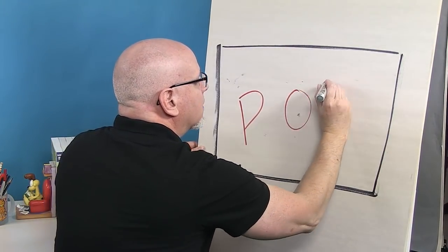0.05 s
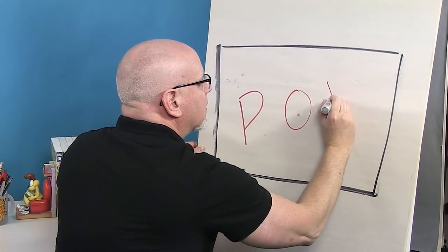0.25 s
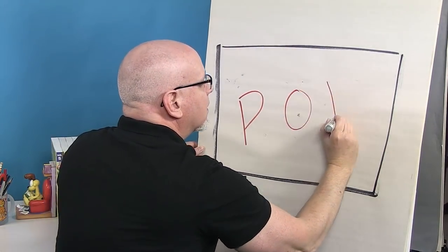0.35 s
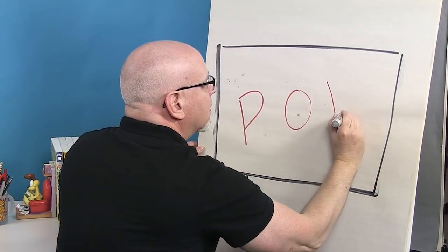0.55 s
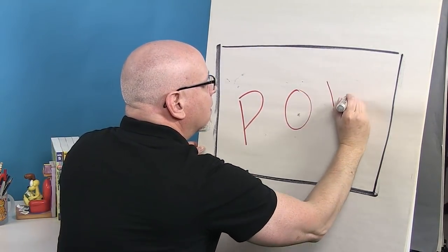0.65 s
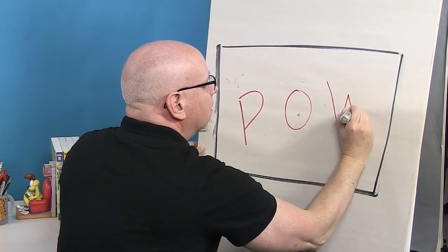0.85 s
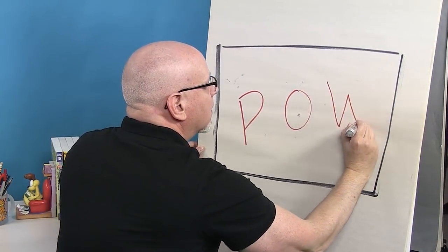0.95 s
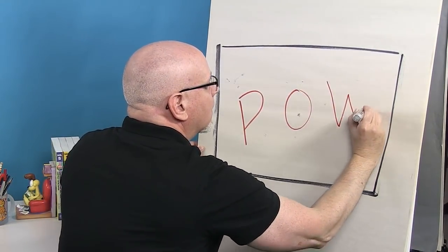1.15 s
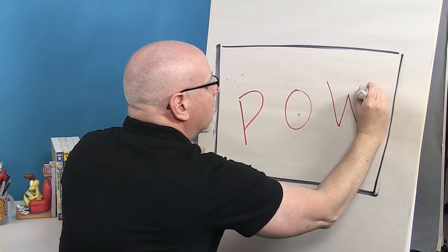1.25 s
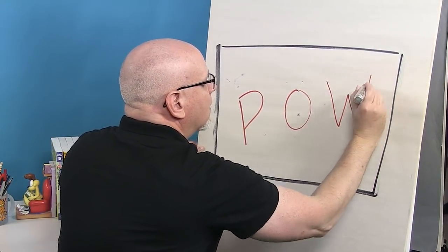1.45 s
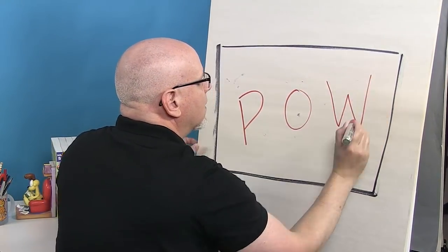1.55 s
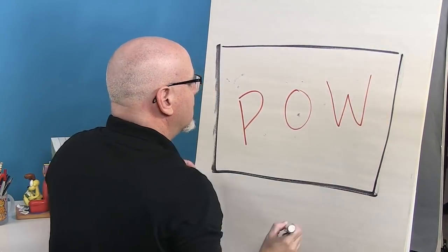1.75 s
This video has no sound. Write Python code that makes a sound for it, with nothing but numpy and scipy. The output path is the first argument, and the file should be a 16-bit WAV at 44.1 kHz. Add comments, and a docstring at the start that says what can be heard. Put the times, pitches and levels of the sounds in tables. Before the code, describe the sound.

Close, dry felt-tip marker strokes scratch across paper, four in a row, alternating softer and harsher. As the last one finishes, the pad gives two soft knocks on its easel, over the faint hum of a small room.

```python
"""A small room with a low hum, where a felt-tip marker draws the four strokes of a W on a large paper pad.
The tip catches on paper fibres and hisses through the pen's resonances, louder and raspier when pushed
up than when pulled down. Pen and hand brush the pad lightly, and as the hand eases off the pad knocks
twice against its easel."""
import sys
import numpy as np
from scipy import signal
from scipy.fft import rfft, irfft
from scipy.io import wavfile

SR = 44100
rng = np.random.default_rng(int(sys.argv[2]) if len(sys.argv) > 2 else 0)


def inscribe(sig):
    """Save sig as 16-bit PCM at rate SR to the path in sys.argv[1].

    A 1-D sig is mono; a 2-D sig holds one channel per row.
    Samples are clipped to [-1, 1] before scaling.
    """
    pcm = np.round(np.clip(np.atleast_2d(sig).T, -1, 1) * 32767)
    wavfile.write(sys.argv[1], SR, pcm.astype(np.int16))


N = 79380


def amp(db):
    """Decibels to gain."""
    return 10 ** (np.asarray(db) / 20)


def unit(x):
    """Scales to rms 1."""
    return x / np.sqrt(np.mean(x ** 2) + 1e-20)


def axes():
    """Time of each sample and frequency of each bin."""
    return np.arange(N) / SR, np.fft.rfftfreq(N, 1 / SR)


def read(points, hz):
    """Reads a curve on a log-frequency axis."""
    f, value = np.transpose(points)
    return np.interp(np.log(hz + 1), np.log(f + 1), value)


def colour(x, gain):
    """Minimum-phase EQ with the given gain at each frequency."""
    log_gain = np.log(np.maximum(gain, 1e-5))
    mirrored = np.concatenate([log_gain, log_gain[-2:0:-1]])
    response = np.exp(np.conj(signal.hilbert(mirrored)))[:len(gain)]
    return irfft(rfft(x) * response, N)


def room_tone():
    """A steady bed of ventilation rumble, faint hiss and mains hum."""
    # Each row: frequency in Hz, relative level of the air noise in dB.
    air_eq = [(15, -83), (25, -73), (64, -12), (119, -6), (178, -4), (198, -10.5), (260, -13.5), (349, -18),
              (421, -24), (523, -18), (648, -29), (826, -26.5), (1110, -29), (1710, -32), (15500, -39.5)]
    air_db, hum_db, hum_hz = -59, -65.5, 118.4
    t, hz = axes()
    air = unit(colour(rng.standard_normal(N), amp(read(air_eq, hz))))
    hum = np.sqrt(2) * np.sin(2 * np.pi * (hum_hz * t + rng.random()))
    return amp(air_db) * air + amp(hum_db) * hum


def friction():
    """Fine rubbing noise plus tiny snaps of the felt on paper fibres, juddering slightly."""
    snags_per_s, snag_spread_db, snag_share = 3500, 2.5, 0.38
    judder_hz, judder_db = 158, 0.54
    _, hz = axes()
    size = amp(snag_spread_db * np.minimum(rng.exponential(1, N), 5))
    snags = size * rng.choice([-1, 1], N) * (rng.random(N) < snags_per_s / SR)
    judder = unit(irfft(rfft(rng.standard_normal(N)) / (1 + (hz / judder_hz) ** 2), N))
    rub = np.sqrt(1 - snag_share) * rng.standard_normal(N)
    return (np.sqrt(snag_share) * unit(snags) + rub) * amp(judder_db * judder)


def near_echoes(x):
    """The writer's arm and body throw back six quick, quiet reflections."""
    _, hz = axes()
    delays_s = rng.uniform(0.00099, 0.008, size=6)
    echoes = amp(-20) * sum(np.exp(-2j * np.pi * hz * delay) for delay in delays_s)
    return irfft(rfft(x) * (1 + echoes), N)


def tip_resonance(x, centre_hz, width_hz=720):
    """The tip rings in a narrow band whose centre slides as the pen tilts."""
    turn = np.exp(2j * np.pi * np.cumsum(centre_hz) / SR)
    pole = np.exp(-np.pi * width_hz / SR)
    return 2 * (turn * signal.lfilter([1 - pole], [1, -pole], x / turn)).real


def stroke(moves, eq, gain_db):
    """Friction rings paper and pen; the felt's fizz on top opens with speed."""
    paper_below_hz, fizz_above_hz = 3455, 7490
    t, hz = axes()
    times, *lanes = np.transpose(moves)
    pen_db, fizz_db, paper_db, tip_hz = (np.interp(t, times, lane) for lane in lanes)
    hiss = rfft(near_echoes(colour(friction(), amp(read(eq, hz)))))
    low = 1 / (1 + (hz / paper_below_hz) ** 16)
    high = 1 - 1 / (1 + (hz / fizz_above_hz) ** 24)
    paper, pen, fizz = (unit(irfft(hiss * band, N)) for band in (low, 1 - low - high, high))
    tip = unit(tip_resonance(tip_resonance(friction(), tip_hz), tip_hz))
    body = amp(-1.75) * pen + amp(-6) * tip
    mix = amp(pen_db) * body + amp(paper_db - 1) * paper + amp(fizz_db + 0.5) * fizz
    on_paper = (t > times[0]) * (t < times[-1])
    return on_paper * amp(gain_db) * mix


def marker():
    """The W: pulled down, pushed up, and both again, each stroke coloured by the angle of the tip."""
    # Automation for each stroke. Each row: time in seconds, faders in dB for pen hiss, felt fizz and
    # paper rasp, tip resonance in Hz.
    down_1 = [(0.197,-70,-85,-70,4100),(0.217,-45.5,-67,-54,3930),(0.266,-42,-58.5,-53.5,4180),(0.315,-45,-58.5,-54,4040),(0.35,-43,-55.5,-51.5,4120),(0.363,-40.5,-54.5,-50,4300),(0.41,-42,-56,-52,4220),(0.484,-41.5,-58.5,-52,4270),(0.51,-55.5,-72,-55.5,4400),(0.525,-76,-87,-73,4330)]
    up_1 = [(0.549,-64,-80,-55,4010),(0.5545,-36,-54,-42.5,4000),(0.565,-38.5,-53,-46.5,3930),(0.6,-38.5,-53.5,-47.5,4100),(0.651,-42,-55.5,-49,4280),(0.675,-39.5,-53,-47,4250),(0.739,-41.5,-57.5,-48,3860),(0.769,-48,-72,-49.5,3750),(0.782,-70,-88,-62,3550),(0.795,-74,-88,-72,3500)]
    down_2 = [(0.822,-68,-84,-65,4200),(0.828,-44,-65,-49,4030),(0.84,-41.5,-63,-48,4210),(0.899,-42.5,-55,-51,4120),(0.951,-38.5,-54.5,-49.5,4280),(0.993,-40,-55,-49.5,4300),(1.059,-44.5,-62,-52.5,4320),(1.093,-57,-70,-52.5,4360),(1.11,-80,-89,-67,4200)]
    up_2 = [(1.128,-67,-82,-62,4040),(1.133,-36.5,-51,-40,4070),(1.168,-38,-55,-45,4400),(1.214,-37,-51.5,-44.5,4360),(1.228,-41.5,-50,-48,4350),(1.242,-36.5,-49.5,-44.5,4370),(1.275,-36.5,-49.5,-43.5,4400),(1.326,-41,-52,-47.5,3960),(1.34,-38.5,-53,-45.5,3950),(1.362,-40.5,-54.5,-51.5,4100),(1.379,-37.5,-58.5,-49,4100),(1.398,-42,-62,-49.5,4080),(1.418,-51,-76,-59,4180),(1.432,-68,-86,-65,4200)]
    # The colour of each stroke's hiss. Each row: frequency in Hz, relative level in dB.
    down_1_eq = [(130,-30),(520,-17),(800,-26),(1300,-12.5),(1950,-16.5),(2650,-13.5),(3050,-9),(3450,-9.5),(4230,-1),(4850,-6),(5600,-9),(6200,-11.5),(6750,-6.5),(7350,-13),(8250,-21.5),(9350,-16),(10400,-25.5),(11400,-23),(15800,-35)]
    up_1_eq = [(130,-27),(560,-17),(800,-26),(1800,-15),(2250,-10),(2650,-13),(3200,-4),(3750,-2),(4200,-1),(4750,-2),(5600,-13.5),(5950,-13),(6250,-15),(7150,-6),(8600,-22.5),(9450,-16.5),(10450,-27),(11400,-24.5),(15800,-40)]
    down_2_eq = [(130,-26),(520,-20),(800,-25.5),(1400,-15),(1900,-17.5),(2250,-12),(2700,-12.5),(3150,-7),(3550,-12),(4270,-1.5),(4850,-7.5),(5600,-11.5),(6200,-16),(6650,-10),(7200,-12.5),(8400,-26),(9200,-15.5),(10400,-29),(11400,-28),(15800,-43)]
    up_2_eq = [(130,-26),(560,-17),(800,-25.5),(1750,-19),(2250,-9),(2450,-10.5),(2950,-5),(3400,-6),(4000,0),(4650,0),(5500,-10),(6200,-13),(7200,-4.5),(8600,-20.5),(9150,-12.5),(9900,-18),(10450,-26),(11200,-25),(14000,-36),(15500,-34)]
    down_db, up_db = -0.5, 1
    return (stroke(down_1, down_1_eq, down_db) + stroke(up_1, up_1_eq, up_db)
            + stroke(down_2, down_2_eq, down_db) + stroke(up_2, up_2_eq, up_db))


def reverb(x):
    """The small room's diffuse tail, each band dying at its own speed."""
    # Each row: frequency in Hz, seconds to fall by 60 dB.
    decay_times = [(150,1),(500,0.21),(1500,0.35),(4000,0.58),(9000,0.71),(16000,0.45)]
    predelay_s = 0.0073
    hz, t, noise = signal.stft(rng.standard_normal(SR // 2), SR, nperseg=256)
    decay = amp(-60 * t / read(decay_times, hz)[:, None])
    _, tail = signal.istft(noise * decay, SR, nperseg=256)
    tail *= np.arange(len(tail)) / SR > predelay_s
    return signal.fftconvolve(x, tail / np.linalg.norm(tail))[:N]


def touches():
    """Pen and hand brush the pad, each touch one short swell of scratchy noise."""
    # Each row: peak time in seconds, level in dB, centre in Hz, spread in octaves, spread in seconds.
    ticks = [(0.764,-44.5,3520,0.041,0.005),(1.1,-68,505,0.75,0.0025),(1.09,-56,2400,0.46,.008),(1.459,-65.5,3300,.07,0.015),(1.456,-67.5,5700,.07,.012),(1.476,-53,146,0.34,0.0063),(1.483,-65,1900,0.85,0.0049),(1.57,-64.5,9900,0.63,0.0097),(1.574,-55.5,10700,0.38,.0012)]
    t, hz = axes()
    mix = np.zeros(N)
    for peak_s, level_db, centre_hz, octaves, spread_s in ticks:
        band = np.exp(-0.5 * (np.log2((hz + 1) / centre_hz) / octaves) ** 2)
        swell = np.exp(-0.5 * ((t - peak_s) / spread_s) ** 2)
        mix += amp(level_db) * unit(colour(rng.standard_normal(N), band)) * swell
    return mix


def knock(start, gain_db, cutoff_hz, rattle_db):
    """The pad chatters briefly on the easel, whose modes start out of step; a cushioned blow is duller."""
    # The easel's ring. Each row: frequency in Hz, relative level in dB, seconds to fall by 60 dB.
    modes = [(221,-12,0.084),(272,-7.5,0.072),(417,-0.5,0.047),(577,-1,0.022),(725,-5.5,0.057),(794,-10.5,0.046),(957,-0.5,0.058),(1142,-6.5,0.073),(1250,0,0.038),(1422,-3,0.059),(1534,-4,0.051),(2190,-6.5,.05),(2620,-16,0.069),(2855,-8.5,.04)]
    # The colour of the chatter. Each row: frequency in Hz, relative level in dB.
    rattle_eq = [(100,-29),(250,6),(900,1.5),(1500,1),(1900,3.5),(3000,-2),(5000,-3.5),(9000,-6),(15000,-31)]
    attack_s, rattle_hold_s, rattle_fall_s = 0.0029, 0.011, 0.0033
    t, hz = axes()
    age = np.maximum(t - start, 0)
    ring = sum(amp(db - 60 * age / t60) * np.sin(2 * np.pi * f * age - np.pi * k ** 2 / len(modes))
               for k, (f, db, t60) in enumerate(modes))
    rattle = unit(colour(rng.standard_normal(N), amp(read(rattle_eq, hz))))
    rattle *= np.exp(-np.maximum(age - rattle_hold_s, 0) / rattle_fall_s)
    attack = np.sqrt(np.minimum(age / attack_s, 1))
    blow = attack * (ring + amp(rattle_db) * rattle)
    cushion = 1 / np.sqrt(1 + (hz / cutoff_hz) ** 6)
    return amp(gain_db) * colour(blow, cushion)


def scene():
    """A mono mix over room tone: the marker almost dry, the knocks with more reverb."""
    # Each row: start in seconds, gain in dB, low-pass cutoff in Hz, rattle gain in dB.
    knocks = [(1.3322, -31.5, 1680, -3.5), (1.509, -37, 4100, -1)]
    pen_send_db, knock_send_db = -29, -7
    pen = marker() + touches()
    blows = (knock(*row) for row in knocks)
    easel = sum(blow + amp(knock_send_db) * reverb(blow) for blow in blows)
    return (pen + amp(pen_send_db) * reverb(pen) + easel + room_tone())[None]


def record(dry):
    """A low cut trims the deepest rumble and a steep high cut takes off the very top."""
    low_cut_hz, high_cut_hz = 55, 15800
    low_cut = signal.butter(2, low_cut_hz, "highpass", fs=SR, output="sos")
    high_cut = signal.firwin(1023, high_cut_hz, window=("kaiser", 9), fs=SR)
    return signal.oaconvolve(signal.sosfilt(low_cut, dry), high_cut[None], "same")


dry = scene()
out = record(dry)
inscribe(out)
```